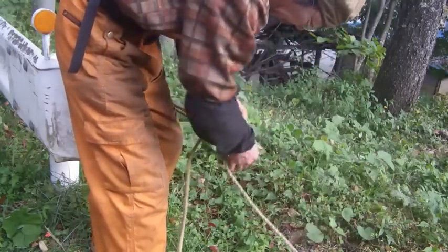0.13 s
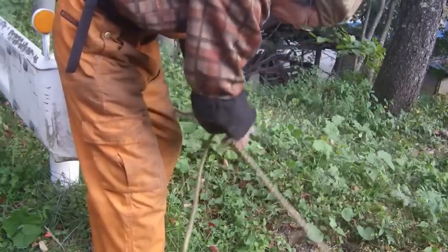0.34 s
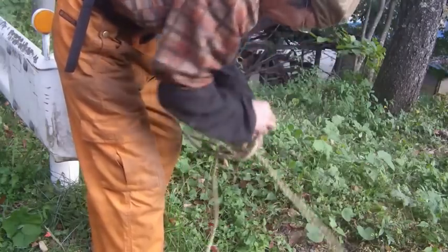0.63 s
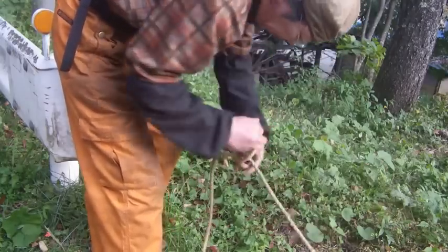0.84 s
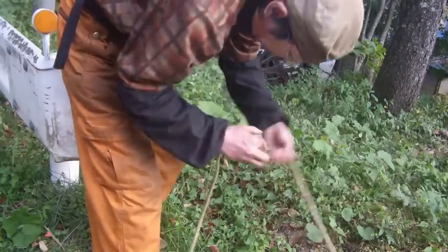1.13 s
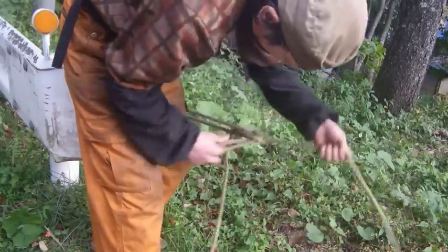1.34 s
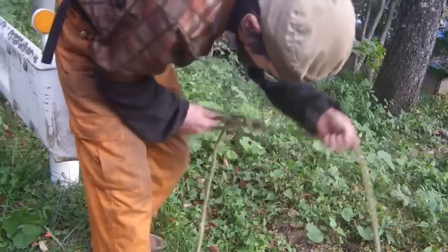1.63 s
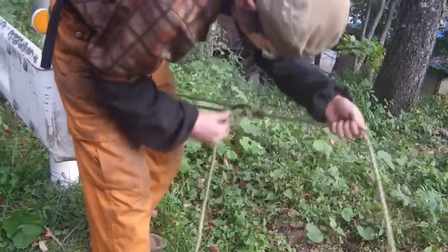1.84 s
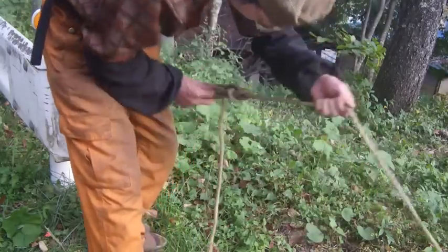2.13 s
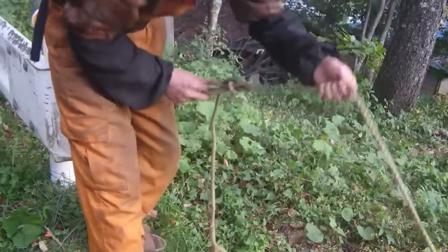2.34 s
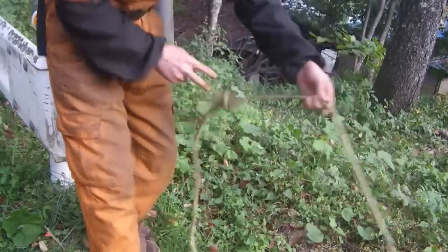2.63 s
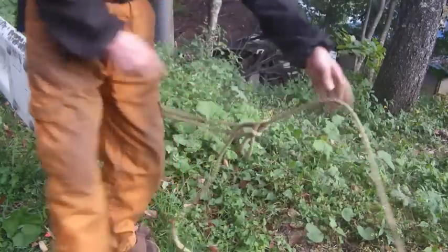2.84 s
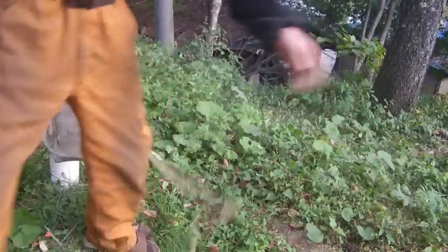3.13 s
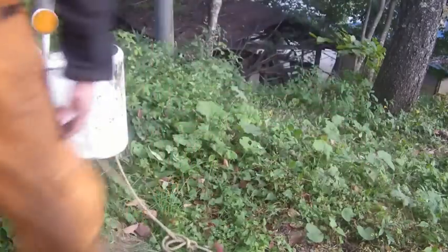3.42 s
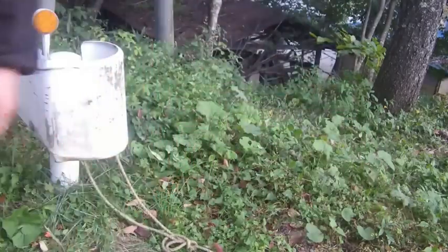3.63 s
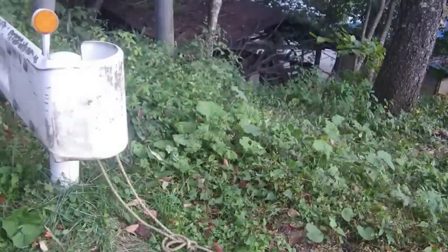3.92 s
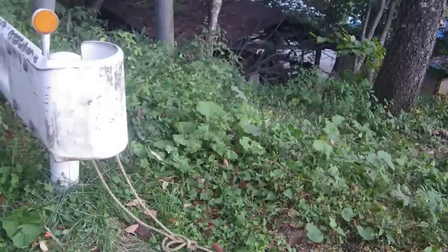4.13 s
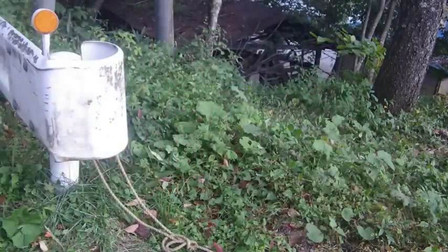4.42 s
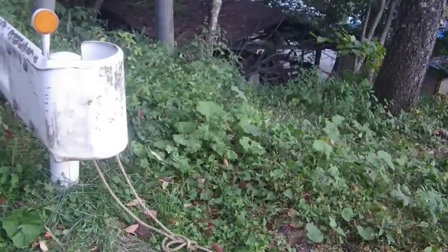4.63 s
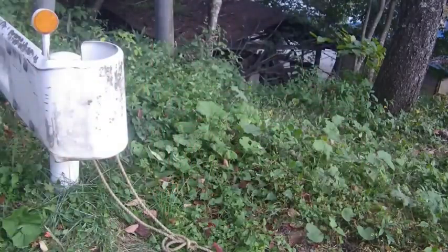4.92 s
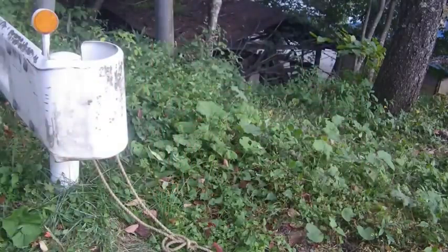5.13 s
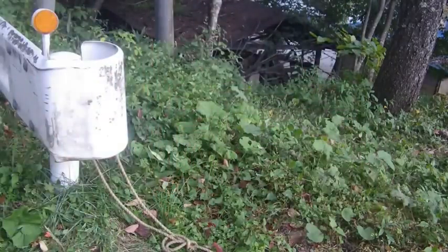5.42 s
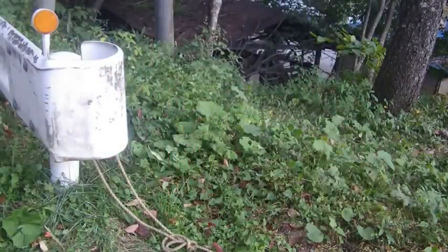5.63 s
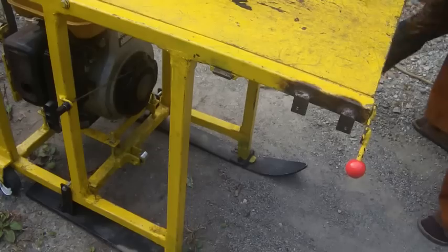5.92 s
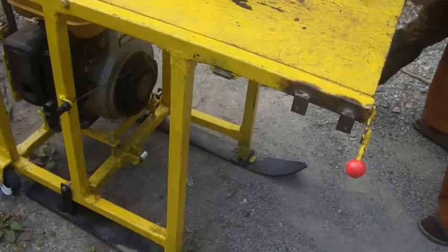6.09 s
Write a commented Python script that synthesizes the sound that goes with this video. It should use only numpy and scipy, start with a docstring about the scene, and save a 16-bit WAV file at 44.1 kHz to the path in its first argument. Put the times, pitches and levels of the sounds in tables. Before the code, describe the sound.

A small single-cylinder engine idles some metres away outdoors, rattling and ticking quickly as its speed drifts up and down. About halfway through, a boot crunches through dry weeds close to the microphone, snapping stalks, and a few soft low bumps follow. Near the end the sound cuts to silence for an instant, then the engine returns from right beside its metal frame, brighter, with sharp spits and a few clanks.

```python
"""A single-cylinder four-stroke winch engine idles some metres away, its speed drifting up and down.
Every cycle rattles the frame, knocks on a cover, puffs out exhaust and makes the valves chatter.
A man steps through dry weeds close by; the snapping stalks push the automatic gain control down,
and it creeps back. Soft bumps shake the microphone. After a short silent break the engine is heard
from right beside its frame, brighter, with sharp spits and a few clanks. The sound is mono."""
import sys
import numpy as np
from scipy import signal
from scipy.fft import irfft
from scipy.io import wavfile
from scipy.ndimage import uniform_filter1d, minimum_filter1d

SR = 44100
rng = np.random.default_rng(int(sys.argv[2]) if len(sys.argv) > 2 else 0)


def to_wav(s):
    """Save 16-bit WAV."""
    ch = np.atleast_2d(s).T  # columns
    pcm = np.round(np.clip(ch, -1, 1) * 32767)  # PCM
    wavfile.write(sys.argv[1], SR, pcm.astype(np.int16))


N = 276066
TIME = np.arange(N) / SR
TAPS = 8192  # samples in a filter or a short ring
HZ = np.fft.rfftfreq(TAPS, 1 / SR)
FAR, NEAR = 0, 1  # where we listen from: picks the far or the near level in a table


def gain_of(db):
    """Turns decibels into a number to multiply by."""
    return 10 ** (np.asarray(db) / 20)


def unit_power(x):
    """Scales a signal so that its average power is 1."""
    return x / np.sqrt(np.mean(x ** 2) + 1e-20)


def curve(rows):
    """Joins (seconds, value) rows with straight lines."""
    return np.interp(TIME, *np.transpose(rows))


def spectrum(points):
    """Joins (Hz, dB) points into a smooth tone shape, on a logarithmic frequency scale."""
    hz, db = np.transpose(points)
    return np.interp(np.log(HZ + 1), np.log(hz + 1), db)


def humps(resonances):
    """Each resonance, a pitch at which a body likes to ring, adds a hump in dB to a tone shape."""
    return sum(db / (1 + (2 * (HZ - hz) / width) ** 2) for hz, width, db in resonances)


def add(mix, start_s, sound):
    """Mixes a sound in at the given time."""
    part = mix[round(start_s * SR):][:len(sound)]
    part += sound[:len(part)]


def tap_response(tone_db):
    """How a body with this tone shape rings after one tap (a minimum-phase filter)."""
    log_gain = np.log(gain_of(np.concatenate([tone_db, tone_db[-2:0:-1]])))
    gain_and_phase = np.exp(np.conj(signal.hilbert(log_gain)))
    return irfft(gain_and_phase[:len(tone_db)])[:len(tone_db)]


def colour(x, tone_db):
    """Passes a sound through a body with this tone shape; white noise keeps its power."""
    ring = tap_response(tone_db)
    return signal.oaconvolve(x, ring / np.linalg.norm(ring))[:N]


def grit(per_s, spread_db):
    """A stream of tiny contacts, random in time and size."""
    size = gain_of(spread_db * np.minimum(rng.exponential(1, N), 4))
    sign = rng.choice([-1, 1], N)
    happens = rng.random(N) < per_s / SR
    return unit_power(size * sign * happens)


def blows(cycles, place, uneven_db, jitter_s=0.00161):
    """One slightly uneven click per engine cycle; a place of -0.25 is a quarter of a cycle early."""
    beats = np.arange(np.ceil(cycles[0] - place), cycles[-1] - place) + place
    size, lateness = rng.standard_normal((len(beats), 2)).T
    times = np.interp(beats, cycles, TIME) + jitter_s * lateness
    samples = np.round(times * SR).astype(int)
    clicks = np.zeros(N)
    clicks[np.clip(samples, 0, N - 1)] = gain_of(uneven_db * np.clip(size, -2, 2))
    return clicks


def bouncing_power(cycles, rows, view, uneven_db, jitter_s):
    """The power of loose parts: each blow sets them bouncing, then they settle."""
    power = np.zeros(N)
    for place, *levels, fade_s in rows:
        clicks = gain_of(levels[view]) * blows(cycles, place, uneven_db, jitter_s)
        power += signal.lfilter([1], [1, -np.exp(-2 / (fade_s * SR))], clicks ** 2)
    return power


def casting_ripple(depth_db=2.0, full_from_hz=1900):
    """Cast metal has many close resonances, which put small ripples in the treble."""
    noise = rng.standard_normal(len(HZ))
    ripple = unit_power(uniform_filter1d(uniform_filter1d(noise, size=5), size=5))
    return depth_db * np.clip(ripple, -2, 1.3) * np.minimum(HZ / full_from_hz, 1) ** 2


# Blows that rattle the engine block and frame.
# Each row: place in the cycle as a fraction, far level in dB, near level in dB, fade time in seconds.
RATTLE_BLOWS = [(-.36, -35.5, -27, 0.018), (-.2, -26, -20.5, 0.029), (.025, -22, -17.5, 0.0089),
                (.17, -26.5, -31, 0.0083)]
# The overall tone of block and frame. Each row: frequency in Hz, relative level in dB.
BLOCK_TONE = [(30, -17.5), (100, -17.5), (300, -15.5), (400, -5), (520, -2.5), (1000, -2.5), (1230, -12),
              (1400, 3.5), (2000, -1), (3800, -0.5), (4900, -2), (5900, -15.5), (9300, -18), (12000, -36)]
# Resonances of the frame, tank and covers. Each row: frequency in Hz, width in Hz, boost or cut in dB.
FRAME_RESONANCES = [(450.5, 28, 11.5), (486.3, 31, 6.5), (533.3, 21, 8.5), (622.5, 28.7, 12.5),
                    (691, 37, 9), (838, 53, 10), (1142, 21, 9), (1442, 30.4, 9.5), (1550, 83, 5),
                    (1610, 45, 3.5), (1688, 43, 9), (2163, 39, 6.5), (2710, 60, 3.5), (3095, 20, 8.5),
                    (3480, 110, 2), (3790, 96, -14.5), (4350, 140, 2)]
def block_rattle(cycles, view, whirr_db, ripple):
    """Rattling parts and the steady whirr of fan and gears make the block and frame ring."""
    power = bouncing_power(cycles, RATTLE_BLOWS, view, uneven_db=.9, jitter_s=.0016)
    power = uniform_filter1d(power, size=200)  # the heavy frame takes a few milliseconds to respond
    shaking = np.sqrt(power + gain_of(whirr_db) ** 2) * grit(per_s=6000, spread_db=1.8)
    return colour(shaking, spectrum(BLOCK_TONE) + humps(FRAME_RESONANCES) + ripple)


# The notes of the engine cover. Each row: pitch in Hz, relative level in dB, seconds to fade by 60 dB.
COVER_NOTES = [(1450, -15.5, .05), (1547, 2, 0.096), (1612, 13.5, 0.033), (1830, -5.5, 0.042)]
def cover_ring(clicks, rise_s=0.00097):
    """Each hit rings the cover's closely spaced notes, which take a moment to swell."""
    t = TIME[:TAPS]
    ring = sum(gain_of(db - 60 * t / ring_s) * np.sin(2 * np.pi * hz * t)
               for hz, db, ring_s in COVER_NOTES)
    ring *= 1 - np.exp(-t / rise_s)
    return signal.oaconvolve(clicks, ring / abs(ring).max())[:N]


# Piston and gear knocks. Each row: place in the cycle as a fraction, far level in dB, near level in dB.
PISTON_KNOCKS = [(-.35, -23, -22), (-.22, -24.5, -20), (-.05, -23, -21), (0.039, -27, -20.5),
                 (0.169, -28.5, -20)]
def knocks(cycles, view):
    """The piston and gears knock in every cycle and ring the cover."""
    clicks = sum(gain_of(levels[view]) * blows(cycles, place, uneven_db=2)
                 for place, *levels in PISTON_KNOCKS)
    return cover_ring(clicks)


# The exhaust pulse and the puffs after it.
# Each row: place in the cycle as a fraction, far level in dB, near level in dB.
EXHAUST_PUFFS = [(-.235, -34.5, -30.5), (0.01, -36.5, -37), (.29, -46.5, -54)]
# The deep tone of the muffler. Each row: frequency in Hz, relative level in dB.
MUFFLER_TONE = [(8, -16), (30, -2.5), (75, -4.5), (100, 1), (150, -2.5), (210, 0), (330, -1.5), (600, -12),
                (2000, -57)]
def exhaust(cycles, view, gas_db=-13, gas_fade_s=0.016):
    """Soft, uneven thumps leave the muffler, each trailed by a gush of gas."""
    tone = spectrum(MUFFLER_TONE)
    thump = tap_response(tone)
    clicks = sum(gain_of(levels[view]) * blows(cycles, place, uneven_db=2)
                 for place, *levels in EXHAUST_PUFFS)
    thumps = signal.oaconvolve(clicks, thump / abs(thump).max())[:N]
    gas_level = signal.lfilter([1], [1, -np.exp(-1 / (gas_fade_s * SR))], clicks)
    gush = colour(gas_level * rng.standard_normal(N), tone)
    return thumps + gain_of(gas_db) * gush


# Ticks of the parts that work the valves.
# Each row: place in the cycle as a fraction, far level in dB, near level in dB, fade time in seconds.
VALVE_TICKS = [(-.21, -55, -34, 0.01), (0.002, -25, -17.5, 0.0085), (.12, -27.5, -23.5, 0.012),
               (.335, -29, -44, 0.008)]
# The bright tone of the chatter. Each row: frequency in Hz, relative level in dB.
CHATTER_TONE = [(1500, -27), (3600, 3), (4900, 0.5), (5400, 2), (5900, -15.5), (7200, -9), (9300, -9),
                (10300, -10.5), (11700, -23), (15500, -35)]
# Resonances of the valve cover. Each row: frequency in Hz, width in Hz, boost in dB.
VALVE_RESONANCES = [(4340, 550, 11), (5100, 160, 3.5), (6500, 190, 17.5), (7790, 230, 10.5),
                    (8280, 500, 7.5)]
def valve_chatter(cycles, view, ripple):
    """Bright bursts of chatter ring the valve cover."""
    power = bouncing_power(cycles, VALVE_TICKS, view, uneven_db=0.4, jitter_s=.0005)
    chatter = np.sqrt(power) * grit(per_s=14000, spread_db=1.5)
    return colour(chatter, spectrum(CHATTER_TONE) + humps(VALVE_RESONANCES) + ripple)


def engine(cycles, view, ripple, whirr_db):
    """One crankshaft drives every part, so all follow the same running count of cycles."""
    return (block_rattle(cycles, view, whirr_db, ripple) + valve_chatter(cycles, view, ripple)
            + knocks(cycles, view) + exhaust(cycles, view))


def frame_boom(sound, boost_db, hz, width_hz):
    """Turns one band of the frame's ringing up or down over time."""
    band = signal.lfilter(*signal.iirpeak(hz, hz / width_hz, fs=SR), sound)
    return sound + (gain_of(boost_db) - 1) * band


# Engine speed, rising and falling about once a second. Each row: time in seconds, firings per second.
FIRING_RATE = [(0.0, 11.67), (0.27, 11.61), (0.56, 12.34), (0.75, 11.87), (1.14, 13.26), (1.55, 10.76),
               (1.95, 13.01), (2.45, 10.93), (2.61, 12.09), (2.81, 11.8), (2.95, 13.12), (3.45, 10.62),
               (3.91, 13.3), (4.19, 11.39), (4.61, 11.23), (4.82, 12.57), (5.28, 11.42), (5.55, 12.26)]
# The frame's lowest resonance swells and fades. Each row: time in seconds, boost or cut in dB.
LOW_RING_SWELL = [(0, -2.5), (1.15, -0.5), (2.3, 2.5), (2.65, -1), (3.0, 3.5), (3.3, -0.5), (3.9, -4),
                  (4.2, 6.5), (4.45, 1), (5.2, -6.5), (5.5, 2)]
def far_engine(ripple, first_tick_s=.053, idle_per_s=12):
    """The engine some metres away: its speed sets the timing and strength of the blows."""
    rate = curve(FIRING_RATE)
    cycles = np.cumsum(rate) / SR
    cycles -= np.interp(first_tick_s, TIME, cycles)
    above_idle = rate - idle_per_s
    speeding_up = uniform_filter1d(np.gradient(rate, TIME), size=6000)
    boom_db = -0.15 * above_idle + .13 * speeding_up  # the frame booms as the engine gains speed
    effort_db = 0.52 + 0.88 * above_idle + 0.0367 * speeding_up  # fast or gaining speed, it fires harder
    sound = engine(cycles, FAR, ripple, whirr_db=-25)
    sound = frame_boom(sound, curve(LOW_RING_SWELL), hz=465, width_hz=70)
    sound = frame_boom(sound, boom_db, hz=780, width_hz=310)
    return gain_of(effort_db) * sound


# Pushes of a boot through the weeds.
# Each row: loudest moment in seconds, level in dB, swell time in seconds, fade time in seconds.
BOOT_PUSHES = [(3.15, -33.5, .02, .03), (3.23, -31.5, .05, 0.051), (3.303, -11, .028, .038),
               (3.395, -24, 0.023, .06), (3.55, -36, .08, 0.21), (3.915, -30, .015, 0.064),
               (4.251, -43.5, .2, 0.23)]
def boot_pressure():
    """How hard the leaves are crushed: each push of the boot swells and fades."""
    pressure = np.zeros(N)
    for peak_s, db, swell_s, fade_s in BOOT_PUSHES:
        from_peak = abs(TIME - peak_s) / np.where(TIME < peak_s, swell_s, fade_s)
        pressure += gain_of(db) * np.exp(-from_peak ** 1.38)
    return pressure


# The tone of dry leaves. Each row: frequency in Hz, relative level in dB.
LEAF_TONE = [(300, -49), (1300, -7.5), (2800, -12), (4600, 1.5), (6200, -2), (7500, -9.5), (10000, -7),
             (12000, -18), (15500, -24.5)]
# The loudest stalks that snap. Each row: start in seconds, level in dB, boosted frequency in Hz.
STALK_SNAPS = [(3.2758, 1, 4660), (3.289, 3, 5240), (3.295, 3.5, 6000), (3.3012, 1.5, 5060),
               (3.332, 6, 2500), (3.4083, 2, 10300), (3.442, -10, 9530), (3.47, -6, 4400),
               (3.475, -5.5, 4400), (3.907, -13, 9300)]
def footsteps(twigs_db=-8.5, snap_fade_s=0.00088, boost_db=7):
    """Leaves crush under a boot, twigs crack among them and single stalks snap."""
    leaves = grit(per_s=10000, spread_db=1.8)
    twigs = gain_of(twigs_db) * grit(per_s=140, spread_db=7.5)
    out = boot_pressure() * colour(leaves + twigs, spectrum(LEAF_TONE))
    t = TIME[:TAPS // 16]
    for start_s, db, hz in STALK_SNAPS:
        stalk = tap_response(spectrum(LEAF_TONE) + humps([(hz, hz / 2, boost_db)]))
        burst = rng.standard_normal(len(t)) * np.exp(-t / snap_fade_s)
        snap = signal.fftconvolve(burst, stalk)
        add(out, start_s, gain_of(db) * snap / abs(snap).max())
    return out


# Soft bumps on the microphone.
# Each row: start in seconds, level in dB, pitch in Hz, seconds to fade by 60 dB.
MIC_BUMPS = [(4.002, -24.5, 35, 0.38), (4.089, -31, 34.5, 0.24), (4.57, -39, 35.4, 0.5)]
def microphone_bumps(rise_s=0.016, overtone_db=-20, overtone_ratio=1.9):
    """Each bump leaves the microphone's mount with a deep, dying wobble."""
    t, out = TIME[:SR], np.zeros(N)
    for start_s, db, hz, ring_s in MIC_BUMPS:
        angle = 2 * np.pi * hz * t
        wobble = np.sin(angle) + gain_of(overtone_db) * np.sin(overtone_ratio * angle)
        rise = 1 - np.exp(-(t / rise_s) ** 2)
        add(out, start_s, gain_of(db - 60 * t / ring_s) * rise * wobble)
    return out


# How the tone changes right beside the frame. Each row: frequency in Hz, boost or cut in dB.
CLOSE_UP_TONE = [(40, -4), (130, -6), (250, -16.5), (450, -9), (630, -5), (950, -2.5), (1230, 6), (1550, 0),
                 (1780, 4), (2400, -0.5), (3700, 3), (4400, 0.5), (4950, 6), (8300, -2.5), (15000, 1)]
def near_engine(ripple, first_tick_s=5.7515, firings_per_s=11.1):
    """Beside the frame the engine runs evenly and sounds brighter, with spits and clanks."""
    cycles = (TIME - first_tick_s) * firings_per_s
    sound = engine(cycles, NEAR, ripple, whirr_db=-23.5)
    brighter = signal.oaconvolve(sound, tap_response(spectrum(CLOSE_UP_TONE)))[:N]
    return brighter + spits(cycles) + clanks()


# Sharp spits of gas and metal, heard only close up. Each row: place in the cycle as a fraction,
# level in dB, fade time in seconds, swing in dB (up on one cycle, down on the next).
SPIT_BURSTS = [(-.235, -24, .011, -4), (0, -19.5, 0.0092, -0.5)]
# The hissy tone of the spits. Each row: frequency in Hz, relative level in dB.
SPIT_HISS_TONE = [(1000, -15.5), (3000, -7), (5100, 5), (6000, 6), (7300, 3), (8300, 3), (10000, -0.5),
                  (12000, -8.5), (15500, -18)]
def spits(cycles, rise_s=.0009):
    """Two short, bright bursts in every cycle; the first is strong and weak by turns."""
    t, level = TIME[:TAPS], np.zeros(N)
    for place, db, fade_s, swing_db in SPIT_BURSTS:
        strength = gain_of(db + swing_db * np.cos(np.pi * (cycles - place)))
        clicks = strength * blows(cycles, place, uneven_db=3, jitter_s=.0008)
        burst_shape = (1 - np.exp(-t / rise_s)) * np.exp(-t / fade_s)
        level += signal.oaconvolve(clicks, burst_shape)[:N]
    return level * colour(grit(per_s=10000, spread_db=3), spectrum(SPIT_HISS_TONE))


# Hard knocks on the cover, heard close up. Each row: start in seconds, level in dB.
COVER_CLANKS = [(5.985, -14), (6.003, -15), (6.074, -8.5), (6.164, -11.5), (6.25, -10.5)]
def clanks():
    """A few harder knocks ring the cover and stand out."""
    clicks = np.zeros(N)
    for start_s, db in COVER_CLANKS:
        add(clicks, start_s, gain_of([db]))
    return cover_ring(clicks)


def scene(far_end_s=5.538, near_start_s=5.711):
    """The far engine with footsteps and bumps, a silent break, then the engine close up."""
    ripple = casting_ripple()
    far = far_engine(ripple) + footsteps() + microphone_bumps()
    far_on = uniform_filter1d(1. * (TIME < far_end_s), size=200)
    near_on = uniform_filter1d(1. * (TIME > near_start_s), size=60)
    mono = far * far_on + near_engine(ripple) * near_on
    return np.array([mono, mono])


def record(dry, ceiling_db=-3, hold_s=0.14, recover_db_per_s=13, treble_limit_hz=15850):
    """The gain control drops at once on a loud peak, holds and creeps back; the top treble is cut."""
    peak_db = 20 * np.log10(abs(dry).max(0) + 1e-9)
    over_db = np.maximum(peak_db - ceiling_db, 0)
    half_hold = int(hold_s * SR / 2)
    held_db = -minimum_filter1d(-over_db, 2 * half_hold + 1, origin=half_hold, mode="constant")
    recovery_db = recover_db_per_s * TIME
    cut_db = np.maximum.accumulate(held_db + recovery_db) - recovery_db
    cut_db = uniform_filter1d(-minimum_filter1d(-cut_db, size=41), size=41)  # round off the sudden drop
    lowpass = signal.firwin(511, treble_limit_hz, window=("kaiser", 9), fs=SR)
    return signal.oaconvolve(dry / gain_of(cut_db), lowpass[None], "same", axes=1)


dry = scene()
out = record(dry)
to_wav(out)
```